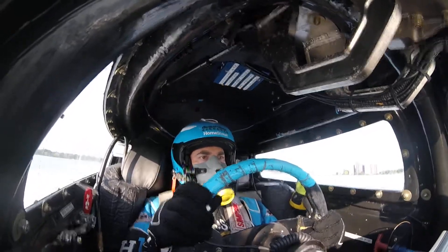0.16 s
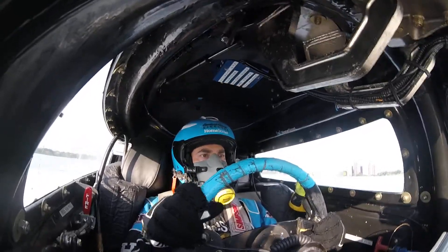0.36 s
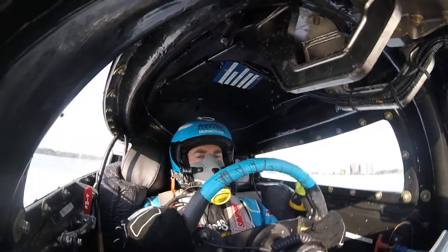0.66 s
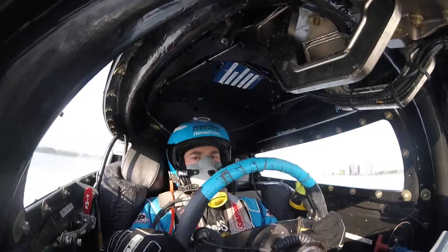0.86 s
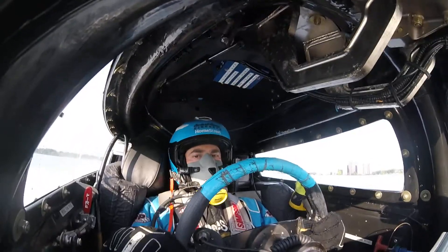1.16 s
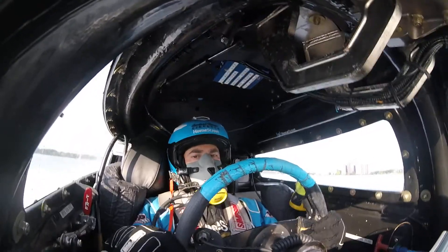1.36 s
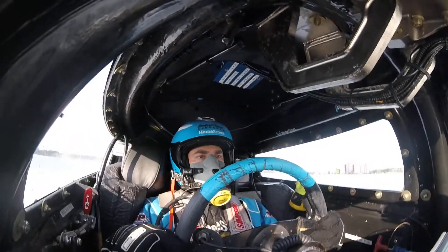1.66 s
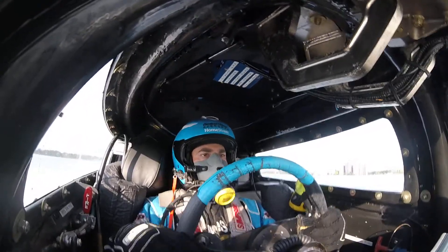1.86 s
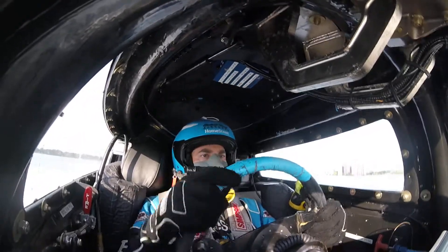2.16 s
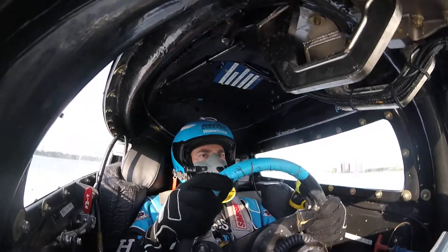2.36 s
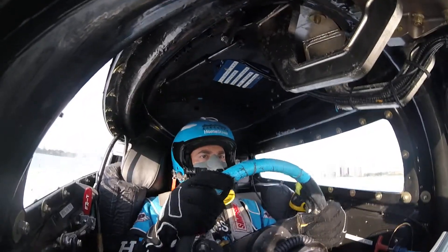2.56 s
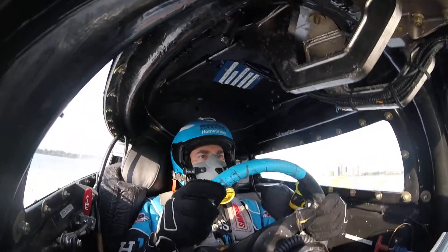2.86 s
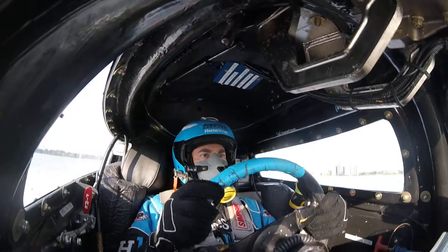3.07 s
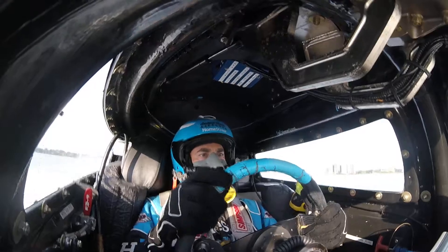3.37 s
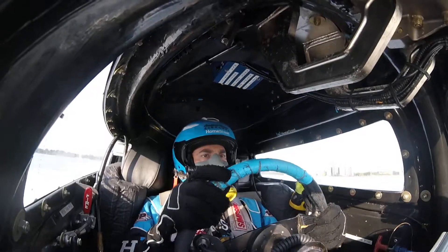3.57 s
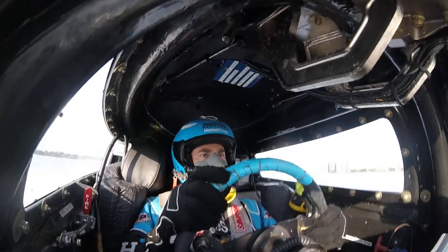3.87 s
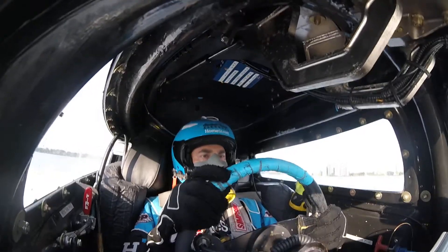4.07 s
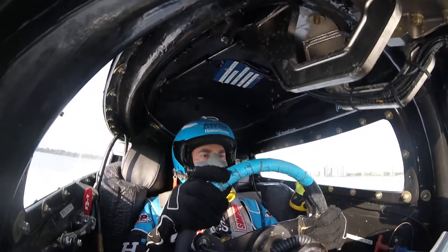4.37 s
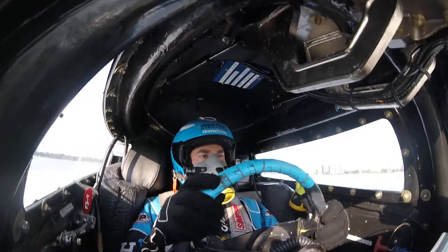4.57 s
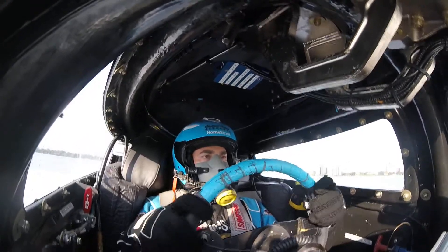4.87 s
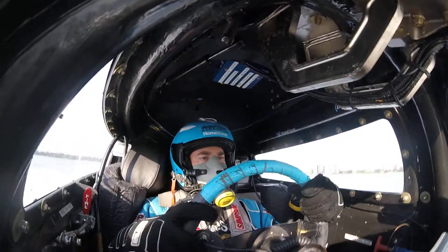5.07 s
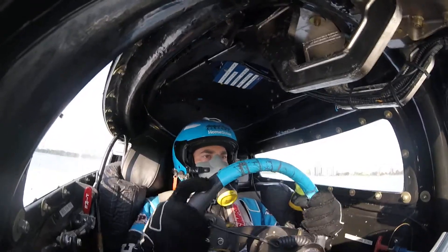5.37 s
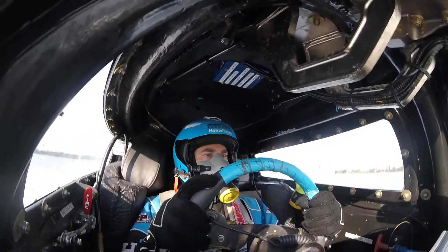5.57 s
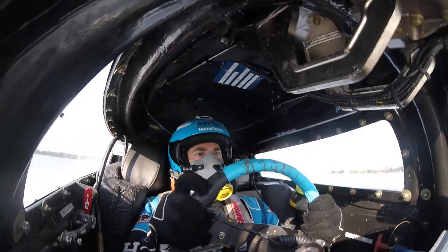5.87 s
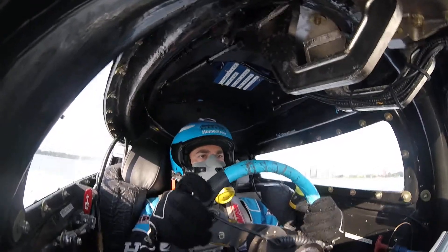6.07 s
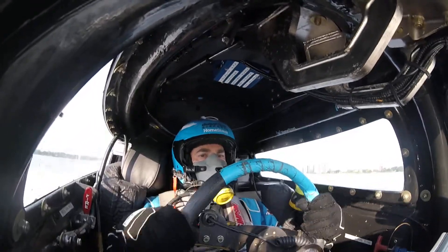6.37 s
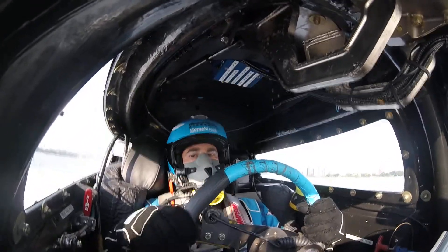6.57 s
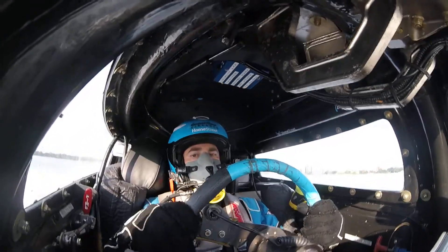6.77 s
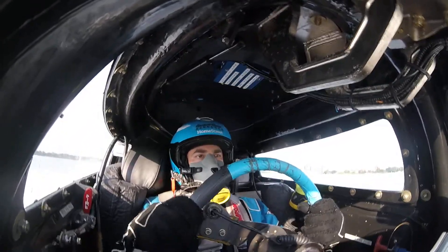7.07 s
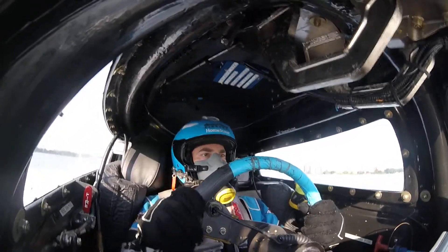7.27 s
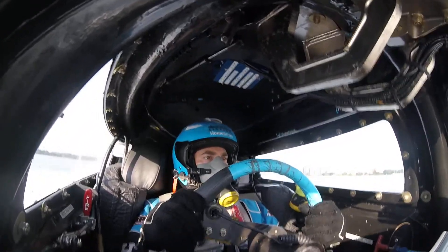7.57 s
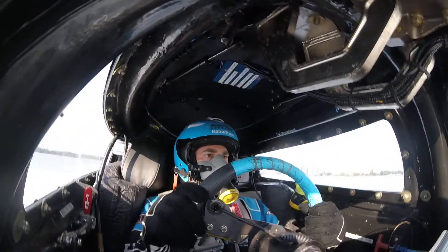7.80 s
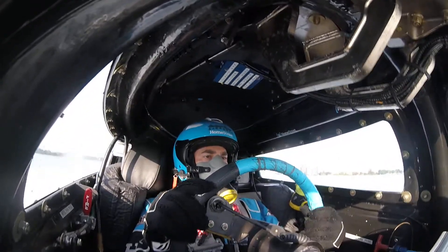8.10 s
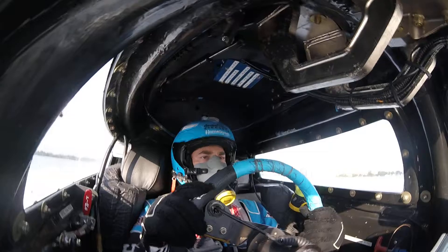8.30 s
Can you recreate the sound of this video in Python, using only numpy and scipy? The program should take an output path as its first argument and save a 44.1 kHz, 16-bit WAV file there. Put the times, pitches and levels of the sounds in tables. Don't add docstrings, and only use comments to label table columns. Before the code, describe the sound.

Loud, steady drone inside a closed powerboat cockpit: a deep propeller-shaft hum with a strong buzzing tone above it, slightly wavering. Water buffets and roars beneath the hull, with thin spray hiss and a faint high turbine whine. Dull knocks, wave slaps and tiny ticks come in uneven bursts throughout. Close, small, overdriven microphone; dense and boxy, beginning and ending mid-run.

```python
import sys
import numpy as np
from scipy import signal
from scipy.fft import rfft, irfft
from scipy.io import wavfile
from scipy.ndimage import uniform_filter1d

SR = 44100
rng = np.random.default_rng(int(sys.argv[2]) if len(sys.argv) > 2 else 0)


def invert_db(level):
    return 10 ** (np.asarray(level, dtype=float) / 20)


def inscribe(sig):
    pcm = np.round(np.clip(np.atleast_2d(sig).T, -1, 1) * 32767)
    wavfile.write(sys.argv[1], SR, pcm.astype(np.int16))


N = 372204
TIME = np.arange(N) / SR
FREQ_HZ = np.arange(N // 2 + 1) * SR / N + 1e-3

# t/s, blade rate/Hz
SHAFT = [(0.0, 232.6), (0.85, 231.4), (1.5, 232.4), (2.1, 231.4), (2.75, 233), (3.4, 232.1), (4.0, 230.3),
         (4.5, 231), (4.95, 229.4), (5.4, 230.4), (5.75, 229.7), (6.6, 230.8), (7.25, 229.6), (7.65, 232),
         (8.0, 230.5), (8.44, 230.3)]
BLADES = 3
TURN_DB, SECOND_DB, BLADE_DB, FOURTH_DB = -15, -30.5, -14.5, -27.5
# multiple of shaft rate, level/dB rms
ORDER = [(5, -36), (6, -55), (9, -46.5), (10, -48.5), (12, -53)]
# t/s, change/dB, spread/s
PITCHING = [(0.19, -3.5, 0.032), (0.37, -2, 0.043), (0.59, -4, 0.048), (0.79, 4, 0.055),
            (1.29, -5.5, 0.037), (1.47, 4, 0.067), (1.78, -5.5, 0.034), (2.66, -5.5, 0.033),
            (3.31, -4.5, 0.04), (3.71, -3.5, 0.077), (4.42, -6, 0.04), (4.68, 2, 0.064), (5.06, 2, 0.16),
            (5.44, -8, 0.067), (5.67, 3, 0.06), (5.84, -2.5, 0.05), (6.03, 2, 0.046), (6.25, -7.5, 0.06),
            (6.57, -6, 0.044), (7.31, 1, 0.18), (7.64, -4, 0.037), (7.85, 4.5, 0.09), (8.15, -3, 0.069),
            (8.34, 2, 0.047)]
# t/s, change/dB
SHOVE = [(0.6, 0.5), (0.82, 0), (1.0, -6), (1.37, -0.5), (1.62, 3), (1.92, 1.5), (2.17, -1), (2.45, -2),
         (2.9, -2), (3.3, -3), (3.6, -2), (3.78, 0.5), (4.15, -4.5), (4.42, 3), (5.05, -1), (5.5, -0.5),
         (5.7, 0.5), (6.38, -3.5), (6.52, -1.5), (6.88, 2.5), (7.4, 0.5), (7.7, 4)]
# t/s, change/dB, spread/s
BITE = [(0.12, 4, 0.08), (0.86, -10.5, 0.013), (1.33, 6, 0.027), (1.56, 3, 0.042), (1.66, -5.5, 0.025),
        (1.87, 3.5, 0.13), (2.04, 3, 0.025), (2.69, 2.5, 0.16), (3.05, 5, 0.019), (3.17, -3, 0.018),
        (3.97, -8, 0.04), (4.27, -6, 0.015), (5.02, -3, 0.05), (5.27, -5.0, 0.095), (5.709, -11, 0.025),
        (5.83, 2, 0.065), (6.13, -7, 0.012), (6.25, -4.5, 0.033), (6.35, -6.5, 0.025), (6.72, -3, 0.1),
        (7.31, -1, 0.11), (7.52, -6, 0.021), (7.61, 5.5, 0.022), (7.73, 5, 0.025), (7.8, 0.5, 0.025),
        (7.86, 4, 0.02), (8.03, -3, 0.029), (8.1, 5, 0.022), (8.16, -7.5, 0.023), (8.41, -18, 0.02)]
# t/s, change/dB
BLADE_WAVE = [(0.3, 0), (0.4, -7), (0.8, -8), (1.1, 3), (1.22, 4), (1.4, -2), (1.5, -1.5), (2.15, -3),
              (2.41, -6.5), (2.72, 3.5), (2.85, -5), (3.4, -3), (4.38, -3), (4.56, -4.5), (4.7, 2),
              (5.02, -5.5), (5.45, -5), (5.73, 3), (6.05, -3), (6.65, 0.5), (7.0, 0.5), (7.15, 4.5)]
# t/s, change/dB
BEARING = [(0.77, 1.5), (1.22, -2), (1.92, 2.5), (2.41, 4.0), (2.66, -0.5), (3.07, 5.5), (5.07, 5.5),
           (5.32, -4), (6.89, -4), (7.38, -10.5), (7.72, -8.5), (8.09, -4.5)]
# t/s, change/dB
WHIP = [(0.04, -2.5), (1.69, -3), (2.4, 2), (2.75, -0.5), (5.04, 4), (5.4, -6.5), (5.85, 1), (6.98, -6),
        (7.43, -4.5), (7.77, -9.5), (7.97, 3.0), (8.34, -5.5)]
SHOVE_S, BLADE_WAVE_S, BEARING_S, WHIP_S = 0.026, 0.014, 0.076, 0.11

# multiple of base rate, level/dB re whine level, line width/Hz
WHINE = [(6, -12.5, 120), (7, 1.5, 53), (8, -32, 60), (9, -13.5, 81), (10, -33, 65), (11, -21.5, 130),
         (12, -28, 110), (13, -49, 90), (14, -23, 170)]
# t/s, change/dB
INTAKE = [(0.4, 3), (0.78, 4), (1.08, 4.5), (1.48, 6.5), (1.66, 3.5), (1.88, 7.5), (2.03, -2.5), (2.72, -6),
          (3.06, -1), (3.18, 3.5), (3.7, 5.5), (3.79, -11.5), (4.64, 7), (6.15, 7), (6.23, -3.5),
          (6.51, 0.5), (6.6, -7), (6.83, 5), (7.07, -3), (7.62, -4.5)]
INTAKE_S = 0.027
WHINE_MAIN, WHINE_HZ, WHINE_DRIFT_HZ = 7, 7086, 9.9
WHINE_DB, WHINE_SWAY_DB = -54, 0.8
WHINE_HZ_PER_BLADE_HZ = 6.0

# f/Hz, density/dB per Hz
HULL = [(18, 5), (30, 2.5), (55, 0), (72, 2), (100, -10.5), (140, -15), (200, -4), (270, 0.5), (340, -1.5),
        (450, -8), (650, -17), (1000, -24.5), (1500, -36.5), (2500, -43)]
# f/Hz, width/Hz, gain/dB
PANEL = [(35, 8.8, -3.5), (47, 9.5, 3), (106, 13, -1), (139, 19, 7), (245.3, 5.2, 6), (276, 25, -3.5),
         (1046, 15, -2), (366, 25, 1.5), (563, 63, 8), (778, 80, 5), (893, 36, 6), (1258, 150, 3),
         (1778, 38, 5), (2040, 160, 3.5), (2565, 42, 5.5)]
# f/Hz, density/dB per Hz
SPRAY = [(600, -11.5), (1200, -7), (2000, -10.5), (2800, -9), (3900, -9), (4700, -16), (5500, -15),
         (6500, -9.5), (7500, -14), (8300, -23.5), (9500, -23), (11000, -23.5), (12500, -35.5),
         (14500, -43.5)]
# t/s, level/dB
CHOP = [(0.0, -35), (0.28, -29), (0.33, -45), (0.68, -31), (0.77, -38), (0.87, -22.5), (1.03, -31.5),
        (3.45, -33.5), (3.69, -36.5), (3.78, -34.5), (4.16, -38.5), (5.12, -27), (5.19, -37.5),
        (5.97, -32.5), (6.3, -39), (7.85, -32), (8.23, -34), (8.44, -29.5)]
# t/s, change/dB
SEAS = [(0.03, -1), (0.34, -3.5), (0.64, 2.5), (0.84, 2.5), (1.15, -2.5), (1.63, -1.5), (2.47, 0),
        (3.2, -1.5), (3.41, 2.5), (3.71, -3), (3.91, 1), (4.13, -2), (4.4, -2), (4.59, 0.5), (4.78, 1.5),
        (5.16, 1), (5.36, -2.5), (5.63, 1.5), (5.88, 0), (6.3, -1), (6.53, -0.5), (7.73, 1), (7.93, -2),
        (8.1, -1.5), (1.04, -3.5), (5.25, 2), (0.08, -2.5), (0.88, -0.5), (1.14, 3.5), (2.42, 0), (3.5, 1),
        (4.3, 1), (4.68, 2), (6.7, 1.5), (6.88, 1.5), (7.1, -1.5), (7.4, 1), (8.4, 0)]
# t/s, change/dB
LIFT = [(0.08, -6.5), (0.38, -2.5), (0.79, -5.5), (1.35, -5.5), (2.09, 0.5), (2.9, 3), (3.67, 2.5),
        (4.23, -3.5), (4.43, 2.5), (4.61, -1), (4.84, 3), (5.12, -3), (5.27, 3.5), (6.14, 3), (6.84, 5),
        (7.11, -6.5), (7.6, 3.5), (7.81, -5.5), (8.0, -1), (8.3, -3.5)]
# t/s, change/dB
SHEET = [(0.1, -7), (0.4, 1.5), (0.88, -0.5), (1.37, 3), (1.87, -2.5), (2.1, 2.5), (2.28, 3), (3.03, 0),
         (3.5, 1.5), (3.8, -3.5), (4.031, 4), (4.82, -3), (5.15, 2.5), (5.3, 4), (5.78, -3), (5.95, 5),
         (6.15, -2.5), (7.25, -2), (7.33, 4), (7.45, 4.5), (7.6, 2.5), (7.85, 3), (7.95, 5), (8.38, 0)]
SEA_S, LIFT_S, SHEET_S = 0.044, 0.07, 0.03
HULL_DB, SPRAY_DB = -16.5, -45
BUFFET_SWAY_DB, ROAR_SWAY_DB = 1.0, 1.0

# t/s, rise/dB
JOLT = [(0.02, 3.5), (0.32, 5), (0.4, 2), (0.64, 3), (0.76, 5.5), (0.869, 8), (1.14, 5), (1.39, 2.5),
        (1.61, 7), (1.98, 5), (2.54, 5), (3.05, 3), (3.27, 3.5), (3.35, -1.5), (4.26, 5), (4.52, 5),
        (4.65, 3.5), (5.03, 4), (5.17, 3), (5.46, 4.5), (2.33, 3), (4.03, 2), (5.98, 3), (5.59, 3.0),
        (6.2, 1.5), (6.64, 5.5), (6.82, 3.5), (6.93, 4), (7.14, 4.5), (7.33, 6), (7.47, 4.5), (7.78, 4.5),
        (8.391, 7.5)]
# f/Hz, width/Hz, level/dB
FITTING = [(3780, 380, -3.0), (3505, 770, -5.5)]
JOLT_S, BUZZ_DB = 0.027, -51

# t/s, peak/dB, f/Hz
KNOCK = [(0.045, -19, 544), (0.084, -11.5, 570), (0.123, -17, 550), (0.625, -20, 403), (0.837, -12.5, 584),
         (0.867, -15, 514), (1.019, -24, 474), (1.228, -18, 407), (1.667, -18, 479), (1.848, -22, 632),
         (1.874, -20.5, 493), (2.214, -16, 401), (2.347, -18.5, 401), (2.77, -14, 495), (2.858, -14, 401),
         (2.996, -13, 540), (3.059, -15.5, 592), (3.315, -15.5, 560), (3.357, -9.5, 540),
         (3.383, -9.5, 473), (3.61, -20.5, 573), (3.707, -14.5, 595), (3.753, -17.5, 557),
         (4.017, -16, 554), (4.551, -19, 468), (4.6, -16, 496), (5.101, -11, 500), (5.322, -16.5, 563),
         (5.349, -19.5, 482), (5.454, -12, 552), (5.765, -10, 410), (6.338, -19, 560), (6.396, -15.5, 390),
         (6.742, -11, 557), (6.897, -7, 554), (7.237, -16, 560), (7.369, -22, 395), (7.436, -17, 587),
         (7.521, -12, 460), (7.652, -12, 540), (7.766, -5, 500), (7.982, -14.5, 420), (8.2, -18, 506),
         (8.242, -20.5, 466)]
KNOCK_RING_DB, KNOCK_FADE_S = -3, 0.0065
# t/s, peak/dB, f/Hz
TICK = [(0.0802, -28, 1390), (0.16, -24, 1750), (0.182, -29, 1710), (0.2149, -33, 1410), (0.254, -30, 1340),
        (0.5062, -25, 1350), (0.5931, -31, 1700), (0.631, -28, 1820), (0.8335, -26, 1760),
        (0.8669, -21, 1410), (0.9298, -35, 1500), (0.9722, -21, 1340), (1.3259, -28, 1390),
        (1.5723, -28, 1790), (1.6611, -28, 1770), (1.8422, -32, 1980), (1.9714, -29, 1310),
        (2.0517, -29, 2010), (2.5995, -28, 1790), (2.6397, -28, 1710), (2.7666, -31, 1490),
        (3.015, -29, 1300), (3.2695, -30, 1500), (3.3124, -26, 1980), (3.3508, -29, 1800),
        (3.382, -28, 1310), (3.4206, -27, 1540), (3.5249, -24, 1330), (3.758, -29, 1780),
        (3.7853, -31, 1310), (3.8566, -30, 1300), (4.2901, -30, 1500), (4.5186, -24, 1340),
        (4.5446, -27, 1300), (4.5735, -28, 1500), (4.7486, -31, 1300), (4.7815, -24, 1500),
        (4.8474, -24, 1300), (5.0185, -33, 2020), (5.3198, -30, 2020), (5.4979, -30, 1520),
        (6.1898, -28, 1360), (6.4268, -22, 1690), (6.6318, -26, 1330), (6.7012, -26, 1800),
        (6.7406, -23, 1300), (6.8598, -31, 1760), (6.8967, -29, 1330), (6.9282, -28, 1800),
        (6.9611, -27, 1330), (7.0264, -26, 1350), (7.0688, -31, 1420), (7.2205, -28, 1780),
        (7.439, -30, 1780), (7.4704, -24, 1340), (7.6475, -24, 1300), (7.9209, -30, 1330),
        (8.0476, -30, 1300), (8.1988, -29, 1340), (8.381, -29, 1800)]
TICK_RING_DB, TICK_FADE_S = -1, 0.0018
SKIN_HZ, SKIN_DB = 2050, -1
# t/s, peak/dB, low thump/dB re peak
SLAP = [(0.1622, -21.5, 10), (0.2145, -22.5, 11), (0.834, -20.5, 13.5), (1.327, -21.5, -2), (1.572, -22, 7),
        (1.9705, -21, 17.5), (2.0525, -22.5, 3.5), (3.268, -23, 10.5), (3.312, -22, -1.5),
        (3.352, -16.5, 0.5), (3.383, -22.5, 9.5), (3.421, -22.5, -2), (3.4908, -23.5, 15),
        (3.5254, -28.5, 4.5), (3.7545, -25, 4), (4.29, -23.5, 4), (4.545, -17, -2), (4.7484, -17.5, -5),
        (4.846, -22.5, -6), (5.3202, -20.5, 9), (6.191, -20, 9), (6.634, -27, 15.5), (6.74, -21.5, 2),
        (6.899, -18.5, 9), (7.0266, -16, 12), (7.1178, -18, 9), (7.4395, -18.5, 1), (7.652, -18, 11),
        (8.201, -28, 19), (8.383, -22, 5)]
# t/s, peak/dB
RIPPLE = [(0.0802, -25), (0.184, -27.5), (0.2538, -22), (0.508, -36), (0.537, -34), (0.5926, -23),
          (0.631, -30.5), (1.2755, -26.5), (1.6603, -33), (1.842, -36), (2.641, -33), (2.7678, -31),
          (2.9923, -31), (3.785, -23), (3.8533, -20.5), (4.5186, -36), (4.782, -23.5), (5.018, -20.5),
          (6.426, -33.5), (6.8608, -34), (6.9293, -28.5), (6.9616, -25), (7.339, -31), (7.9209, -21),
          (8.0474, -24)]
RIPPLE_THUMP_DB = 10.5
# f/Hz, density/dB per Hz
CRACK = [(500, -10), (1000, 3.5), (2000, -4.5), (3000, -12), (4000, -10.5), (5500, -29.5), (7000, -31),
         (9000, -51)]


def level(x, db):
    return x * invert_db(db) / np.sqrt(np.mean(x ** 2))


def curve(table):
    return np.interp(TIME, *np.transpose(table))


def walk(rate_hz):
    k = int(SR / rate_hz)
    held = np.repeat(rng.standard_normal(4000), k)[:N + k]
    w = uniform_filter1d(uniform_filter1d(held, k), k)[:N]
    return w / w.std()


def swells(table, spread_s=None):
    s, db, *own_s = np.transpose(table)
    spread_s = own_s[0] if own_s else spread_s
    coarse = TIME[::200, None]
    bells = db * np.exp(-0.5 * ((coarse - s) / spread_s) ** 2)
    return np.interp(TIME, coarse[:, 0], bells.sum(axis=1))


def jolts():
    return swells(JOLT, JOLT_S)


def colour(points):
    hz, db = np.transpose(points)
    return invert_db(np.interp(np.log(FREQ_HZ), np.log(hz), db, right=-120))


def panels():
    return invert_db(sum(db / (1 + (2 * (FREQ_HZ - hz) / width_hz) ** 2) for hz, width_hz, db in PANEL))


def shaped(x, gain):
    return irfft(rfft(x) * gain, N)


def bands(gain, low_hz, count, flicker_db, rate_hz, shared_db):
    out = 0
    spectrum = rfft(rng.standard_normal(N)) * gain
    below = walk(rate_hz / 2)
    for k in range(count):
        place = np.clip(2 * np.log2(FREQ_HZ / low_hz) - k, -1, 1)
        above = walk(rate_hz / 2)
        sway = invert_db(flicker_db * walk(rate_hz) + shared_db * (below + above))
        out = out + sway * irfft(spectrum * np.cos(np.pi / 2 * place) ** 2, N)
        below = above
    return out


def rings(table, gain_db, fade_s):
    out, t = np.zeros(N + 4096), np.arange(4096) / SR
    envelope = np.exp(-t / fade_s) * (1 - np.exp(-4 * t / fade_s))
    for s, peak_db, hz in table:
        i = int(s * SR)
        out[i:i + len(t)] += invert_db(peak_db + gain_db) * envelope * np.sin(2 * np.pi * hz * t)
    return out[:N]


def shaft():
    angle = 2 * np.pi * np.cumsum(curve(SHAFT)) / BLADES / SR

    def order(k, db, shake_db, wobble_rad, rate_hz, lead_rad=0):
        size = np.sqrt(2) * invert_db(db + shake_db * walk(rate_hz))
        wobble = wobble_rad * (walk(rate_hz) + 0.5 * walk(2.5 * rate_hz))
        return size * np.cos(k * angle + lead_rad + wobble)

    turn_db = TURN_DB + swells(PITCHING) + swells(SHOVE, SHOVE_S)
    blade_db = BLADE_DB + swells(BITE) + swells(BLADE_WAVE, BLADE_WAVE_S)
    fourth_db = FOURTH_DB + 1.3 * swells(BEARING, BEARING_S)
    second_db = SECOND_DB + 1.3 * swells(WHIP, WHIP_S) - 1
    hum = order(1, turn_db, 1.5, 0.08, 7.6)
    hum = hum + order(BLADES, blade_db, 1.6, 0.14, 18, lead_rad=np.pi / 2)
    hum = hum + order(BLADES + 1, fourth_db, 1.0, 0.58, 12)
    hum = hum + order(2, second_db, 2.5, 0.7, 14)
    return hum + sum(order(k, db, 3.5, 0.8, 12) for k, db in ORDER)


def turbine():
    blade_hz = curve(SHAFT)
    follow_hz = WHINE_HZ_PER_BLADE_HZ * (blade_hz - blade_hz.mean())
    main_hz = WHINE_HZ + follow_hz + WHINE_DRIFT_HZ * walk(8)
    main_db = WHINE_DB + swells(INTAKE, INTAKE_S) + WHINE_SWAY_DB * walk(8.7)
    angle = 2 * np.pi * np.cumsum(main_hz) / WHINE_MAIN / SR
    out = 0
    for k, db, width_hz in WHINE:
        pole = np.exp(-2 * np.pi * 0.69 * width_hz / SR)
        noise = rng.standard_normal((2, N))
        a, b = level(signal.lfilter([1], [1, -2 * pole, pole ** 2], noise), db)
        out = out + (a + 0.46 * invert_db(db)) * np.cos(k * angle) + b * np.sin(k * angle)
    return out * invert_db(main_db + 2.5)


def water():
    chop_db = curve(CHOP)
    chop_db = chop_db - chop_db.mean()
    jolt_db = jolts()

    buffet_db = 0.87 * swells(LIFT, LIFT_S) + BUFFET_SWAY_DB * walk(8.5)
    roar_db = 0.13 * chop_db + 0.98 * swells(SEAS, SEA_S) + ROAR_SWAY_DB * walk(12)
    hull = bands(colour(HULL) * panels(), 14.5, count=16, flicker_db=0.83, rate_hz=32, shared_db=0.51)
    hull = level(hull, HULL_DB)
    low = shaped(hull, 1 / (1 + (FREQ_HZ / 90) ** 6))
    under_hull = low * invert_db(buffet_db) + (hull - low) * invert_db(roar_db)

    spray = bands(colour(SPRAY) * panels(), 600, count=11, flicker_db=0.5, rate_hz=40, shared_db=-0.4)
    spray = level(spray, SPRAY_DB) * invert_db(1.57 * walk(60) + 0.22 * walk(18))
    body = shaped(spray, 1 / (1 + (FREQ_HZ / 3200) ** 6))
    top = shaped(spray, 1 / (1 + (8000 / FREQ_HZ) ** 8))
    body_db = 0.39 * chop_db + 0.13 * jolt_db
    hiss_db = 0.95 * jolt_db - 1.0
    top_db = 0.4 * jolt_db + 1.8 * walk(14) + swells(SHEET, SHEET_S) - 0.5
    return under_hull + body * invert_db(body_db) + (spray - body - top) * invert_db(hiss_db) + top * invert_db(top_db)


def buzz():
    ticks = (rng.random(N) < 500 / SR) * rng.standard_normal(N) * invert_db(1.5 * walk(50))
    ring = 0
    for hz, width_hz, db in FITTING:
        mode = signal.iirpeak(hz, hz / width_hz, SR)
        ring = ring + invert_db(db) * signal.lfilter(*mode, signal.lfilter(*mode, ticks))
    return level(ring, -3) * invert_db(BUZZ_DB + 1.8 * jolts())


def slaps():
    crack, thump = np.zeros(N), np.zeros(N)
    for s, peak_db, _ in KNOCK:
        thump[int(s * SR)] += invert_db(peak_db - 13)
    ripples = [(s, db + 0.5, RIPPLE_THUMP_DB) for s, db in RIPPLE]
    for s, peak_db, thump_db in SLAP + ripples:
        crack[int(s * SR)] += invert_db(peak_db - 10)
        thump[int(s * SR)] += invert_db(peak_db + thump_db - 15)
    chance, size = rng.random((N, 2)).T
    crack += (chance < 170 / SR) * invert_db(-53.5 + 10 * size)

    def fade(x, rise_s, fall_s):
        for tau_s in (rise_s, fall_s):
            x = signal.lfilter([1], [1, -np.exp(-1 / (tau_s * SR))], x)
        return x / (rise_s * SR)

    sharp = level(shaped(rng.standard_normal(N), colour(CRACK) * panels()), 0)
    dull_gain = panels() / (1 + ((FREQ_HZ - 600) / 300) ** 4)
    dull = level(shaped(rng.standard_normal(N), dull_gain), 0)
    blows = fade(crack, 0.0004, 0.007) * sharp + fade(thump, 0.00066, 0.0088) * dull
    return blows + rings(KNOCK, KNOCK_RING_DB, KNOCK_FADE_S)


def skin_ticks():
    skin = [(s, db, SKIN_HZ) for s, db, _ in TICK]
    return rings(TICK, TICK_RING_DB, TICK_FADE_S) + rings(skin, TICK_RING_DB + SKIN_DB, TICK_FADE_S)


def scene():
    return (shaft() + turbine() + water() + buzz() + slaps() + skin_ticks())[None]


def top_cut(x):
    return signal.sosfilt(signal.butter(12, 14580, fs=SR, output="sos"), x)


def record(dry):
    opened = dry * np.clip(np.minimum(TIME, TIME[::-1]) / 0.002, 0, 1)
    mix = 1.2 * np.tanh(opened / 1.2)
    return top_cut(mix)


dry = scene()
out = record(dry)
inscribe(out)
```